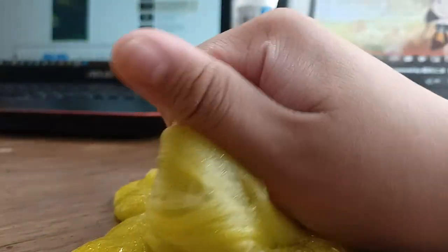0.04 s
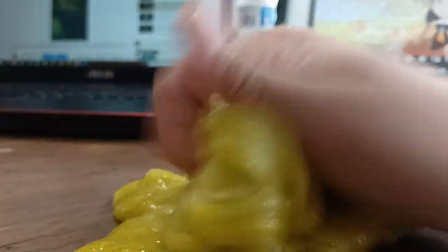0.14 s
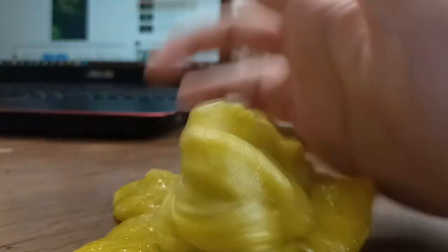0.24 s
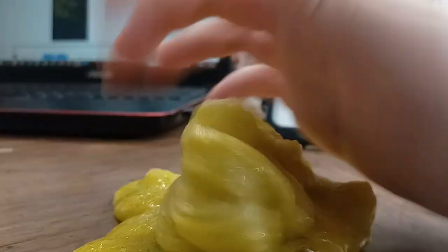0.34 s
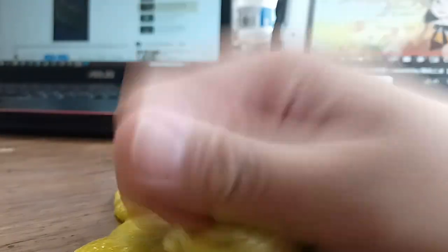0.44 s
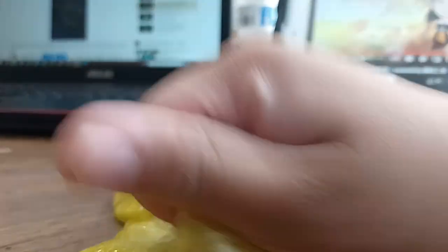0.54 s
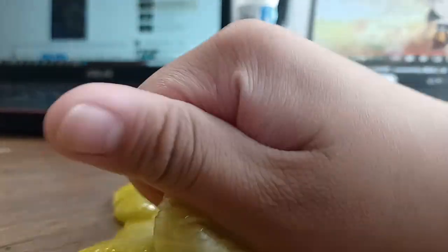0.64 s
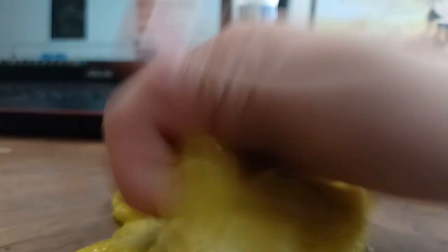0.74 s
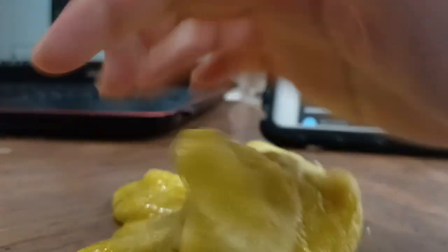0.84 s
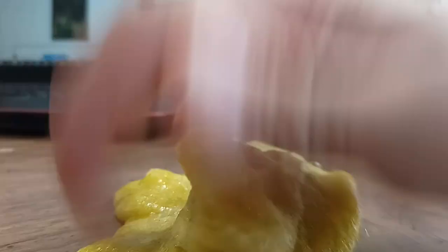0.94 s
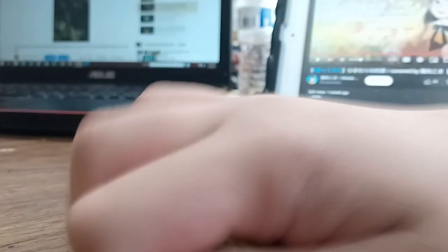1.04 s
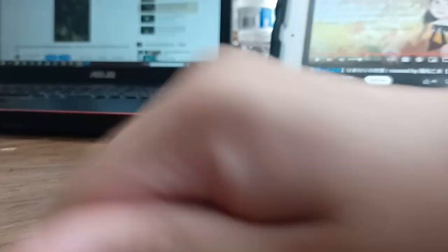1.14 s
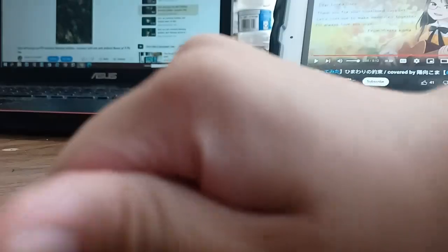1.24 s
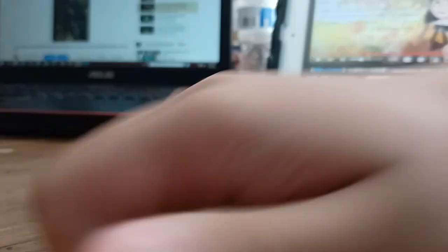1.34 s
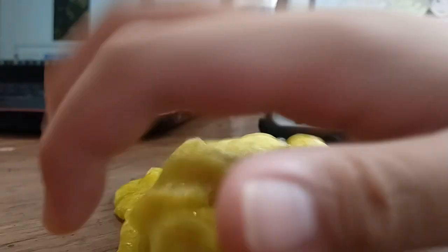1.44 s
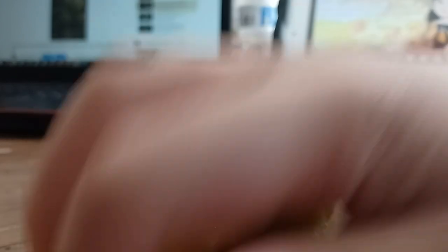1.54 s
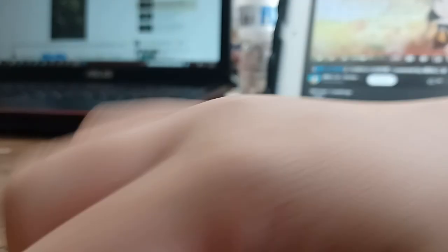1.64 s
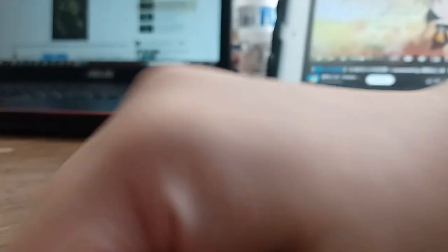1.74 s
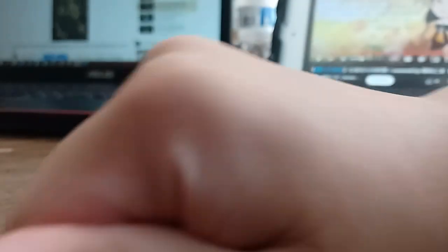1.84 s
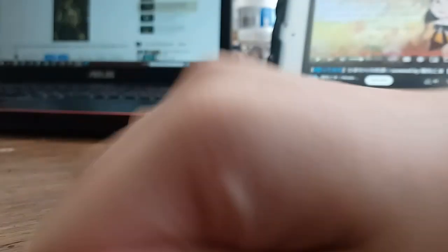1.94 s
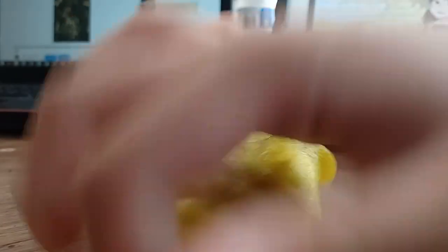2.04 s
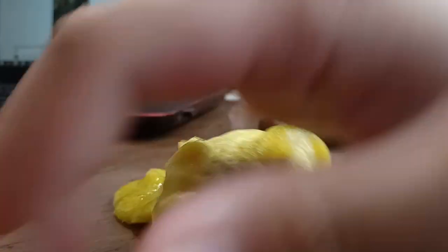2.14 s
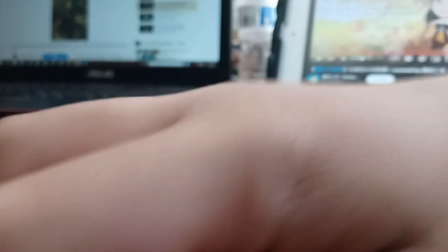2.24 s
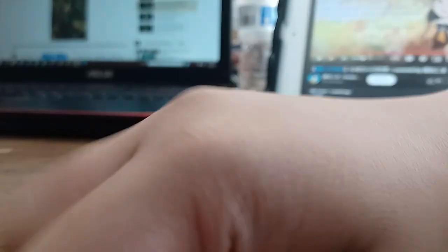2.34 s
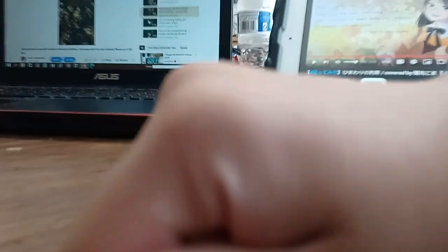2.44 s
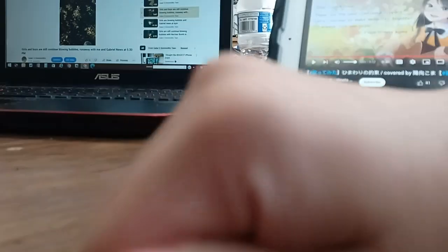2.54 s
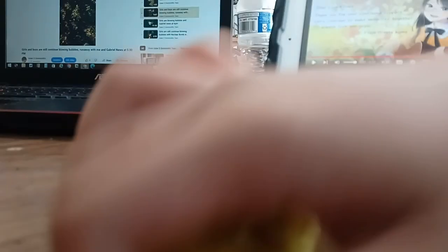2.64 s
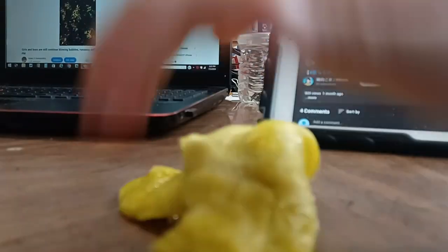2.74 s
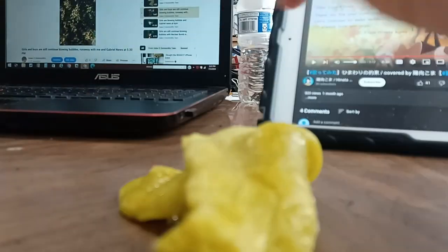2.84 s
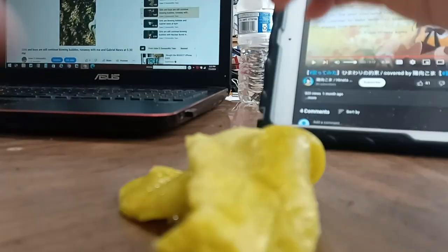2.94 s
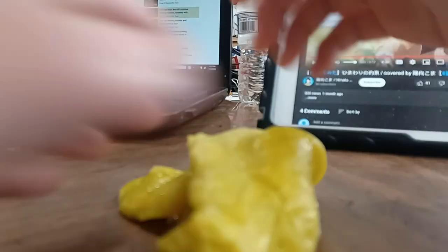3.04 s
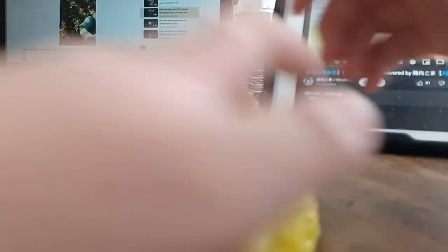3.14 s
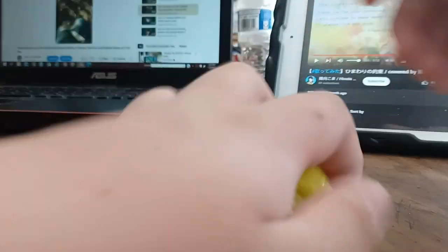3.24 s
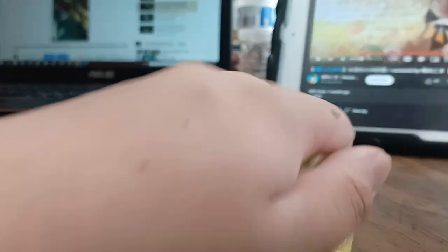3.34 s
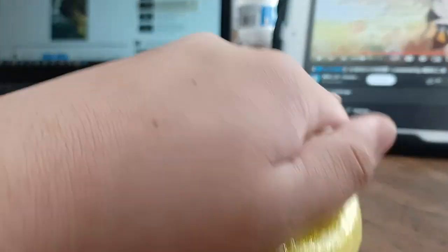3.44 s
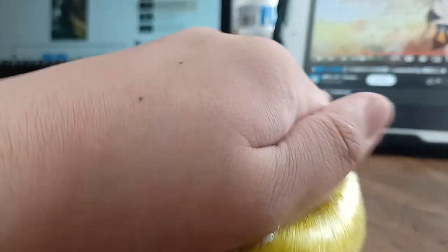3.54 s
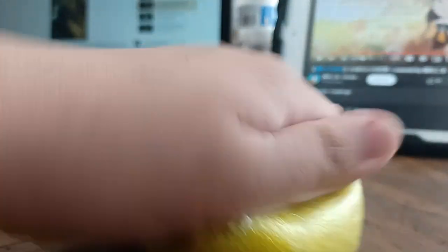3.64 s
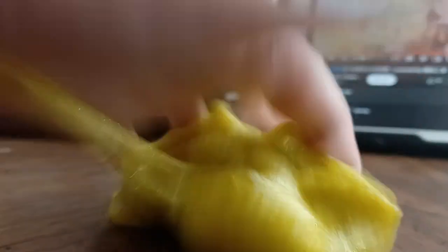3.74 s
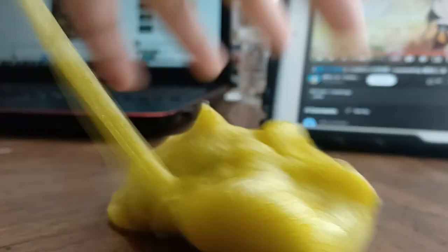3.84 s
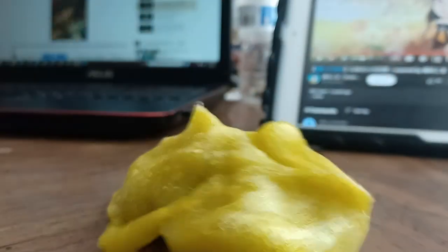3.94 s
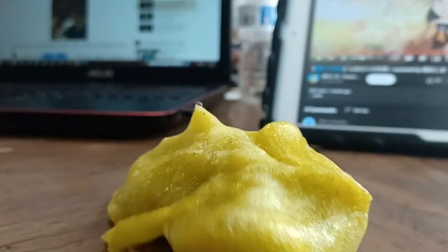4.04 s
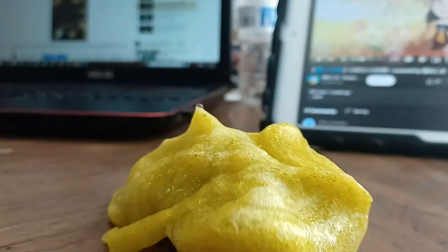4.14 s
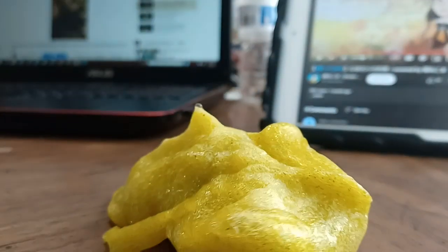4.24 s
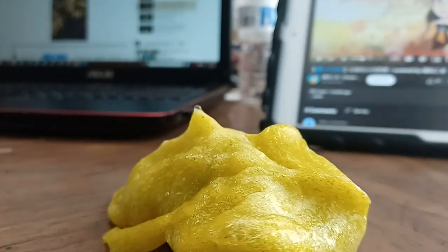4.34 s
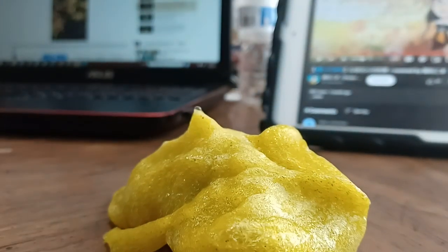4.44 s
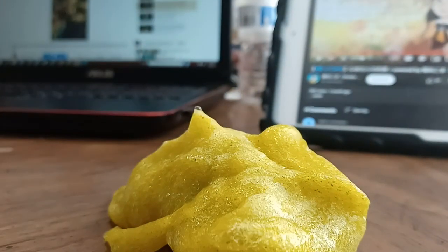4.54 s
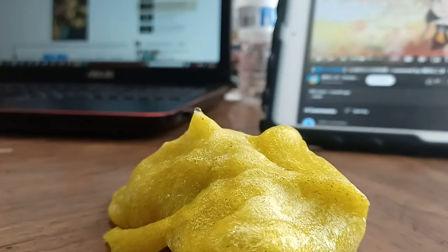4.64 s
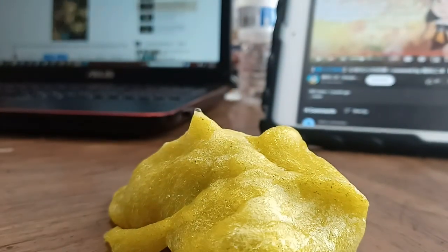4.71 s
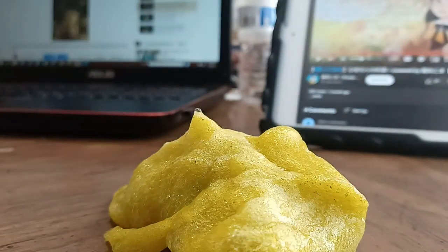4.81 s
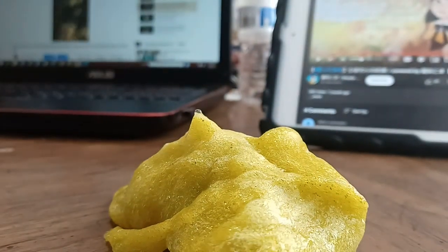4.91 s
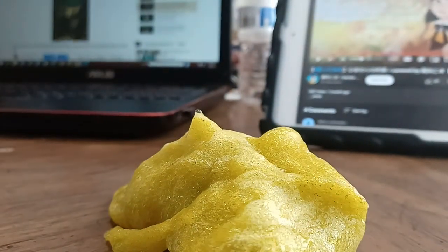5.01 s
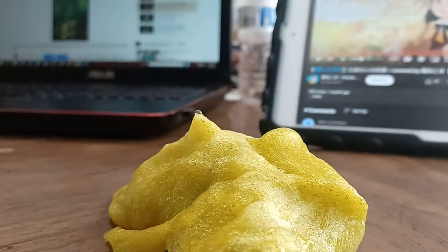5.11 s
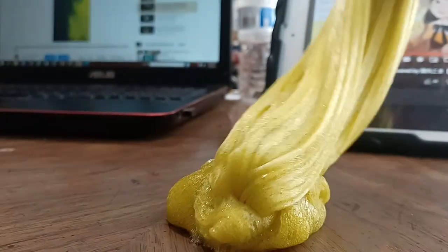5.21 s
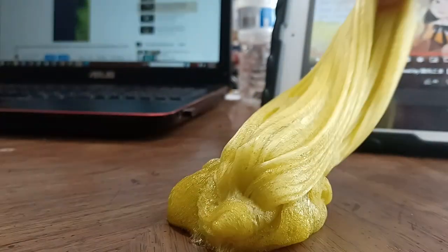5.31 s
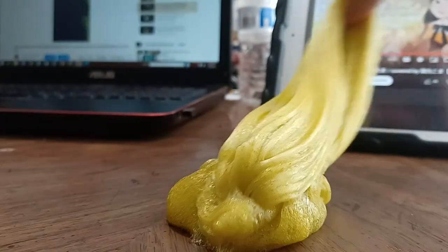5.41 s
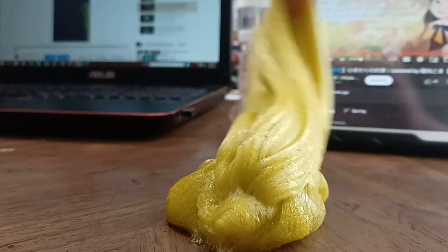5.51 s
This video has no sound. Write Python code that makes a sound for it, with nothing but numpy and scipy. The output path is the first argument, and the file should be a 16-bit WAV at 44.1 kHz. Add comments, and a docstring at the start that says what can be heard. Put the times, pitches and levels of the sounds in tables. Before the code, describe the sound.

Fingers squeeze soft slime very close up, bubbles snapping in wet crackling bursts with dull thuds, then near stillness over a low room hum.

```python
"""At a wooden table in a room with a low hum, fingers knead soft slime close to a two-port microphone.
Trapped bubbles burst in quick runs as snaps that ring pockets; jets of air wobble the membrane at the left port.
Skin and slime rustle, hiss and squelch as grainy coloured noise, and tiny bubbles crackle as short resonances.
The lump thuds as damped sines with slaps of noise; noise with narrow peaks hums over a faint hiss.
The levels of hum and hiss rise and fall slowly."""
import sys
import numpy as np
from scipy import signal
from scipy.fft import rfft, irfft
from scipy.io import wavfile
from scipy.ndimage import uniform_filter1d

SR = 44100
rng = np.random.default_rng(int(sys.argv[2]) if len(sys.argv) > 2 else 0)


def put_to_file(sound):
    """Save the sound as 16-bit audio at rate SR, in the file named by the first command-line argument."""
    columns = np.atleast_2d(sound).T  # one column per channel
    safe = np.clip(columns, -1, 1)
    whole_steps = np.round(safe * 32767)
    wavfile.write(sys.argv[1], SR, whole_steps.astype(np.int16))


N = 245637

# Relative levels of the hum and the faint background hiss: time_s, hum_db, hiss_db
BACKGROUND_LEVELS = [(0, -51, -83.5), (.5, -58, -82), (.75, -52, -79.5), (1.1, -57, -80.5),
                     (1.32, -51.5, -83), (1.55, -53, -85.5), (2.6, -50, -79), (3.4, -49.5, -68.5),
                     (4.36, -50.5, -75.5), (5.57, -53, -71)]
# Relative spectra of the low rumble and of the faint hiss: frequency_hz, density_db (per Hz)
RUMBLE_SPECTRUM = [(25, -45.5), (50, -15.5), (110, -1), (165, -11.5), (210, 0.5), (300, -9.5), (410, -6),
                   (520, -23), (800, -39.5), (2500, -64)]
HISS_SPECTRUM = [(290, -40), (500, -9), (721, -8), (885, -7), (1330, -16.5), (1660, -20.5), (5190, -34.5),
                 (15600, -30.5), (16500, -38.5)]
# Narrow peaks in the hum: frequency_hz, width_hz (of each of two filter passes), relative level_db
HUM_PEAKS = [(240.95, 18, 1.5), (209.5, 10, -13), (406.7, 39, -12.5)]
# Likeness of left and right noise: frequency_hz, correlation (0 to 1)
PORT_LIKENESS = [(60, 0.75), (290, 0.9), (640, 0.073), (1400, 0.0067), (15000, 0.0089)]
# The lump pressed or dropped on the table: start_s, relative level_db, pitch_hz, t60_s
THUDS = [(.177, -24.5, 257.5, 0.076), (0.19, -21, 255, 0.061), (0.7845, -31, 264, 0.03),
         (1.6207, -24.5, 338, 0.013), (2.2864, -27.5, 424, 0.028), (2.3637, -18, 324, 0.015),
         (2.662, -21, 265, 0.021), (3.552, -29.5, 797, 0.032), (3.763, -42, 223, 0.15),
         (3.787, -24, 256, 0.029), (3.822, -29.5, 303, 0.069), (4.32, -35, 136, 0.11)]
# Air jets of near bursts reaching the left port: start_s, relative level_db
PUFFS = [(0.0234, -23), (0.0368, -19.5), (0.0919, -22.5), (0.1012, -18), (0.109, -36), (1.155, -27.5),
         (1.1692, -16), (1.213, -25.5), (1.252, -20), (1.2624, -13.5), (1.8279, -26), (1.8517, -29),
         (2.479, -31)]
# Relative spectra of slime rustle, skin hiss and wet squelch: frequency_hz, density_db (per Hz)
RUSTLE_SPECTRUM = [(1200, -24), (1900, 0), (2700, -3), (4500, -2), (7000, -2.5), (9000, -16),
                   (12000, -15.5)]
SKIN_SPECTRUM = [(6500, -16), (9000, -4), (12500, 2.5), (15700, -0.5), (16200, -28.5)]
SQUELCH_SPECTRUM = [(250, -8.5), (450, -7.5), (800, -4.5), (1300, -16.5), (1750, -13.5), (2200, -23.5),
                    (3400, -41)]
# Finger strokes over and into the slime: start_s (swell complete), length_s, fade_db_per_s,
# relative rustle_db, skin_db, squelch_db
STROKES = [(0, .15, 500, -41, -37, -43.5), (0.193, 0.011, 404, -38.5, -42.5, -35.5),
           (0.23, 0.064, 443, -56, -56.5, -48), (0.325, .08, 303, -76, -64.5, -93),
           (0.531, .05, 697.5, -59.5, -59.5, -86), (0.6, 0.09, 699, -44, -38.5, -48),
           (0.723, 0.026, 700, -51, -48, -78), (0.784, 0.045, 602, -42, -45, -41),
           (1.155, 0.13, 699.5, -41, -42, -48), (1.275, 0.031, 251, -39.5, -34, -47),
           (1.365, 0.075, 454, -43.5, -45.5, -45), (1.644, 0.12, 495.5, -62, -90, -57.5),
           (1.732, 0.046, 500, -54.5, -56.5, -52), (1.79, 0.12, 311, -46, -46.5, -54),
           (1.955, 0.05, 300, -56, -57.5, -69), (2.039, 0.025, 385, -42.5, -43, -42),
           (2.29, 0.025, 302, -72, -93, -57), (2.347, 0.095, 490, -52.5, -57.5, -59),
           (2.467, 0.097, 300, -47.5, -43, -57.5), (2.576, .07, 500, -57, -52.5, -66),
           (2.662, 0.043, 284, -42, -44, -44), (3.106, 0.143, 500, -70, -56.5, -84),
           (3.287, 0.028, 402.5, -55, -53, -60.5), (3.342, 0.12, 500, -48.5, -47.5, -57.5),
           (3.504, 0.065, 231, -43.5, -42, -46), (3.691, 0.099, 497, -48.5, -53, -53),
           (3.753, 0.026, 200, -45.5, -44.5, -38.5), (3.804, 0.036, 500, -45.5, -46, -41.5),
           (3.887, 0.046, 252, -64, -63.5, -67), (3.987, 0.28, 203.5, -79, -66.5, -95),
           (4.238, 0.18, 151.5, -81, -86.5, -64.5), (4.528, 0.0085, 190.5, -59.5, -61, -60),
           (5.221, .04, 197, -87, -90.5, -59)]
# Bursting bubbles: time_s, relative level_db, pocket_pitch_hz, treble_over_body_db, left_minus_right_db
BURSTS = [(0.0029, -15.5, 8100, 14.5, 7.5), (0.0097, -12, 8000, 5.5, 10), (0.0231, -10.5, 920, 6, 9),
          (0.0294, -14.5, 6800, 1, 12), (0.0358, -11, 6860, 3, 6.5), (0.049, -14.5, 8960, 12, 13),
          (0.0901, -24.5, 8900, 11, 0), (0.0997, -7.5, 2290, 4.5, 3), (0.1077, -29, 920, 0.5, 2.5),
          (0.491, -55.5, 2120, -12, 12), (0.5494, -37.5, 4800, -11.5, 10), (0.558, -36, 5680, -13, 11),
          (0.5772, -14, 5660, -9, 9), (0.6072, -18.5, 8860, -5, 16), (0.6157, -15.5, 6720, 0.5, 16),
          (0.6333, -18, 5340, 1, 10), (0.6394, -15, 1720, 5.5, 3.5), (0.658, -18.5, 8260, 13, 1),
          (0.679, -15, 6100, 1.5, 18), (0.7364, -30, 4360, 3, -6), (1.1073, -36, 2150, -8.5, 9),
          (1.1312, -31, 2870, -6.5, 6.5), (1.1367, -16, 2070, -6, 7), (1.1432, -12, 4740, -2, -7),
          (1.1512, -22.5, 4000, 16.5, 3.5), (1.1535, -18, 2080, -5, 4), (1.1675, -6.5, 5300, -2.5, 11),
          (1.177, -14.5, 1030, 19, 8), (1.1814, -30.5, 1810, 6, 6.5), (1.1963, -14, 4170, 1, 5.5),
          (1.2129, -16.5, 890, -1.5, 45), (1.252, -8, 910, 3.5, 16.5), (1.2622, -6.5, 7050, -1.5, 10),
          (1.369, -29, 3530, -18, -2), (1.6518, -42.5, 4440, -27, -1), (1.7321, -40, 3960, -3, 11),
          (1.7375, -32, 6550, -20, 40), (1.7618, -27.5, 4140, -11, 12), (1.7767, -27, 4430, 2.5, 20.5),
          (1.794, -15.5, 3770, 2.5, 3), (1.8059, -14.5, 5800, -1, 6), (1.8176, -27.5, 5650, -21, 10.5),
          (1.8237, -22, 890, -14, 16), (1.8274, -1, 5900, 2, 10.5), (1.8503, -14.5, 5050, -11, 17.5),
          (1.8695, -19, 5940, 5.5, -5), (1.8757, -19, 4800, 6, 18), (1.879, -17, 4800, 4, 14),
          (1.951, -26, 6100, -2.5, 1), (2.024, -33, 5080, -11, -1), (2.286, -48.5, 1960, -15, -2),
          (2.356, -30.5, 3270, 7.5, 8), (2.3842, -28, 3070, 7, 4), (2.3924, -33.5, 3500, -9, 3),
          (2.4074, -37, 3700, -5, 7), (2.423, -22.5, 4700, 3, 12), (2.4261, -13, 6040, 2.5, 5.5),
          (2.4411, -18.5, 7100, -4, 1), (2.4495, -21, 6370, -1, 13), (2.467, -24, 6290, 7, 4),
          (2.479, -14.5, 6660, -10, 9), (2.5136, -14, 6250, -4.5, 14.5), (2.5296, -16.5, 3200, 4.5, 4.5),
          (2.6617, -23, 2360, -26, 8), (3.28, -19.5, 5680, -10, 11), (3.336, -32, 4900, -7, 4),
          (3.36, -25.5, 5230, 0, 1), (3.3684, -21, 5510, 8, 1), (3.397, -13, 6900, 5.5, 2),
          (3.4133, -27.5, 1010, -9, 3), (3.4251, -27, 1190, 4, 0), (3.4363, -35, 3280, -6, 8),
          (3.477, -31.5, 940, 2, -2), (3.4868, -27, 2240, -6, 20), (3.5033, -14, 6800, 1.5, 1),
          (3.5116, -17.5, 2350, 4.5, -9), (3.5694, -18, 2240, 2.5, -11), (3.575, -21, 3790, -23, 1),
          (3.9193, -36.5, 4220, -2, 7), (3.93, -42, 4050, 3, -3), (3.981, -53.5, 4000, -3.5, 5),
          (4.239, -68, 1502, 0, 9), (4.512, -50.5, 6600, -1.5, -6), (5.2218, -47.5, 1210, -12, 10)]

RISE_DB_PER_S, SAG_DB_PER_S = 704, 22.5   # a stroke swells, then eases while it lasts
TAIL_DB, TAIL_DB_PER_S = -16, 172.5   # the room carries each stroke on, weaker and smoother
CRACKLES_PER_S, CRACKLE_DB = 300, -7   # mean rate of tiny bubbles, level against the rustle
LAG_S = .00022   # bursts reach the right port later: the left is nearer the hands
STOP_EDGE_HZ = 17050   # the top is cut by 50 dB from here up


def amp(db):
    """A level in decibels is the logarithm of an amplitude ratio."""
    return 10 ** (np.asarray(db) / 20)


def rms_one(x):
    """Mean-square power sets strength: scale to unit rms."""
    return x / np.sqrt(np.mean(x ** 2) + 1e-20)


def in_time(rows):
    """Slow levels vary linearly between their listed times: each column at every sample."""
    time_s, *columns = np.transpose(rows)
    return [np.interp(np.arange(N) / SR, time_s, column) for column in columns]


def at_hz(points, hz):
    """A spectrum is interpolated along a logarithmic frequency axis."""
    table_hz, values = np.array(points).T
    return np.interp(np.log(hz), np.log(table_hz), values)


def drift(rate_hz):
    """Low-passed noise wanders slowly: two equal poles, unit rms, computed at every 40th sample."""
    r = np.exp(-2 * np.pi * rate_hz * 40 / SR)
    noise = rng.standard_normal(N // 40 + 2002)
    slow = signal.lfilter([1], [1, -2 * r, r * r], noise)[2000:]   # the filter has settled
    return np.interp(np.arange(N) / 40, np.arange(len(slow)), rms_one(slow))


def resonance(x, hz, width_hz):
    """A damped resonator is a pole pair; its gain is 1 at the peak."""
    r = np.exp(-np.pi * width_hz / SR)
    zeros = [(1 - r * r) / 2, 0, (r * r - 1) / 2]
    poles = [1, -2 * r * np.cos(2 * np.pi * hz / SR), r * r]
    return signal.lfilter(zeros, poles, x)


def coloured(spectrum, grain_db=0, grain_rate_hz=100):
    """Shared and opposed noise set the likeness of the ports; level swells make grains; unit rms."""
    hz = np.maximum(np.fft.rfftfreq(N, 1 / SR), 1)
    alike = np.clip(at_hz(PORT_LIKENESS, hz), -1, 1)
    grains = amp(grain_db * np.abs(drift(grain_rate_hz)))
    mid, side = rfft(rng.standard_normal((2, N)) * grains)
    pair = np.sqrt(1 + alike) * mid + np.sqrt(1 - alike) * side * [[1], [-1]]
    return rms_one(irfft(pair * amp(at_hz(spectrum, hz)), N))


def add(out, start_s, sound):
    """Superposition: sounds add linearly from their start times."""
    i = round(start_s * SR)
    out[..., i:i + sound.shape[-1]] += sound[..., :N - i]


def hum():
    """Narrow-band noise wavers in level: a few such peaks stand in low rumble, over faint hiss."""
    hum_db, hiss_db = in_time(BACKGROUND_LEVELS)
    rumble = coloured(RUMBLE_SPECTRUM, grain_db=2.0, grain_rate_hz=5.1)
    white = coloured([(100, 0.0014), (600, 0.0074)])   # almost exactly flat
    peaks = 0
    for hz, width_hz, db in HUM_PEAKS:
        narrow = resonance(resonance(white, hz, width_hz), hz, width_hz)
        peaks = peaks + amp(db) * rms_one(narrow)
    return amp(hum_db) * (rumble + amp(-0.5) * peaks) + amp(hiss_db) * coloured(HISS_SPECTRUM)


def thuds():
    """Impulsive excitation: a soft blow rings the table top briefly, with a dull slap of noise."""
    out, t = np.zeros(N), np.arange(5000) / SR
    dull = signal.butter(2, [150, 700], "band", fs=SR, output="sos")
    slaps = signal.sosfilt(dull, rng.standard_normal((len(THUDS), t.size)))
    onset = 1 - np.exp(-t / 0.00096)
    for (start_s, db, hz, t60_s), slap in zip(THUDS, slaps):
        knock = (np.sin(2 * np.pi * hz * t) + amp(-7.0) * slap) * amp(-60 * t / t60_s)
        add(out, start_s, amp(db) * knock * onset)
    return out * amp([[1.5], [-1.5]])


def puffs():
    """Damped oscillation: a jet of air pushes the membrane, which swings back in a low wobble."""
    out, t = np.zeros(N), np.arange(3000) / SR
    phase = 2 * np.pi * 95 * t + 2.8 * (1 - np.exp(-t / 0.00063))   # fast push, then 95 Hz
    push = np.sin(phase) * amp(-60 * t / 0.039)
    for start_s, db in PUFFS:
        add(out, start_s, amp(db + 5.0) * push)
    return out * amp([[0], [-26]])   # almost all at the left port


def stroke_gains():
    """Powers add: strokes swell, ease and fade; a second, weaker gain fades at its own rate."""
    power, t = np.zeros((2, 3, N)), np.arange(N) / SR
    for start_s, length_s, fade_db_per_s, *db in STROKES:
        since = t - start_s
        after = np.maximum(since - length_s, 0)
        swell_db = RISE_DB_PER_S * np.minimum(since, 0)
        held = amp(swell_db - SAG_DB_PER_S * np.clip(since, 0, length_s))
        fading = amp([-fade_db_per_s * after, TAIL_DB - TAIL_DB_PER_S * after])
        power += (amp(db)[:, None] * held * fading[:, None]) ** 2
    return np.sqrt(power)


def crackle():
    """Cavity resonance: tiny pockets burst at random, each ringing a few cycles at its pitch and place."""
    struck = rng.random(N) < CRACKLES_PER_S / SR
    sizes = amp(1.3 * np.minimum(rng.exponential(1, N), 4)) * struck
    sides = sizes * amp(rng.normal(7.5, 6.6, N) * [[1], [-1]])   # mostly to the left
    pitches_hz, dealt = np.geomspace(900, 9000, 12), rng.integers(0, 12, N)
    rings = [resonance(sides * (dealt == k) + 1e-18, hz, 0.27 * hz) for k, hz in enumerate(pitches_hz)]
    return rms_one(sum(rings))


def hands():
    """Friction noise: skin slides over slime in grainy rustle with crackle, hiss and a wet low squelch."""
    (rustle_gain, skin_gain, squelch_gain), tail_gains = stroke_gains()
    rustle = coloured(RUSTLE_SPECTRUM, grain_db=5.0, grain_rate_hz=110) * amp([[.6], [-.6]])
    rustle = rustle + amp(CRACKLE_DB) * crackle()
    skin = coloured(SKIN_SPECTRUM, grain_db=1.5, grain_rate_hz=120)
    squelch = coloured(SQUELCH_SPECTRUM, grain_db=6.0, grain_rate_hz=67) * amp([[2.5], [-2.5]])
    spectra = (RUSTLE_SPECTRUM, SKIN_SPECTRUM, SQUELCH_SPECTRUM)
    lingering = sum(gain * coloured(spectrum) for gain, spectrum in zip(tail_gains, spectra))
    return rustle_gain * rustle + skin_gain * skin + squelch_gain * squelch + lingering


def pops():
    """Pressure release: the film tears and snaps, its pocket rings, hands and table scatter a short tail."""
    out, t = np.zeros((2, N)), np.arange(700) / SR
    chance = rng.standard_normal((len(BURSTS), 3, t.size))
    body_band = signal.butter(2, [600, 8500], "band", fs=SR, output="sos")
    late = t - .0005   # time since the snap
    tearing = amp(np.where(late < 0, 60 * late / 0.0045, -60 * late / 0.00067))
    scattering = amp(-60 * np.abs(late - .0004) / np.where(late < .0004, .002, .011))
    for (time_s, db, hz, treble_db, pan_db), (tear, *scatter) in zip(BURSTS, chance):
        snap = amp(-16.5) * tear * tearing
        snap[np.argmax(late >= 0)] += 1   # one sharp step of pressure once the tearing has grown
        tail = amp(-16.5) * np.array(scatter) * scattering
        burst = snap * amp([[0], [-.7 * pan_db]]) + tail   # the hand shades the snap more than the scatter
        pocket = signal.sosfilt(body_band, burst) + amp(11) * resonance(burst, hz, 0.34 * hz)
        sizzle = resonance(resonance(burst, 11900, 9000), 11900, 9000)
        left, right = rms_one(pocket) + amp(treble_db) * rms_one(sizzle)
        right = rms_one(np.interp(t - LAG_S, t, right, left=0))
        sound = np.array([rms_one(left), amp(-pan_db) * right])
        power = uniform_filter1d(np.mean(sound ** 2, axis=0), size=22)   # half-millisecond mean
        add(out, time_s - .0003, amp(db - 1.5) * sound / np.sqrt(power.max()))
    return out


def scene():
    """Superposition of all sources at the two ports."""
    return hum() + thuds() + puffs() + hands() + pops()


def record(dry):
    """Band limits and overload: the small capsules lose the deepest bass, peaks clip, the top is cut."""
    bass_cut = signal.butter(2, 45, "high", fs=SR, output="sos")
    capsule = np.clip(signal.sosfilt(bass_cut, dry), -1, 1)
    top_cut = signal.cheby2(16, 50, STOP_EDGE_HZ, fs=SR, output="sos")
    return signal.sosfilt(top_cut, capsule)


dry = scene()
out = record(dry)
put_to_file(out)
```